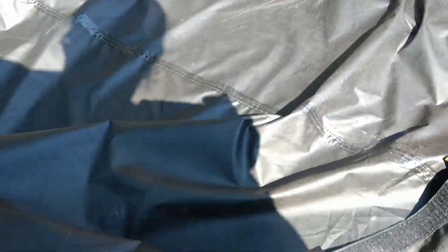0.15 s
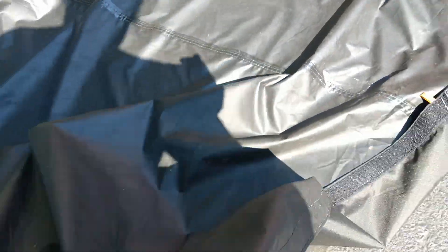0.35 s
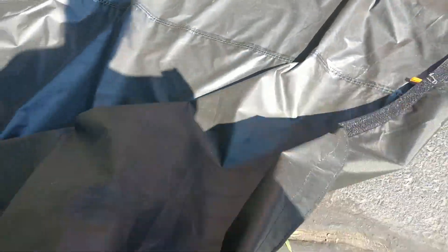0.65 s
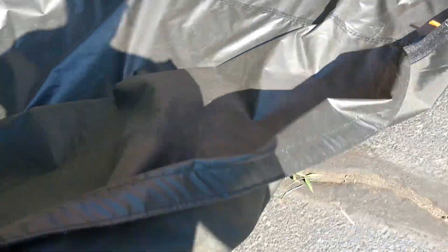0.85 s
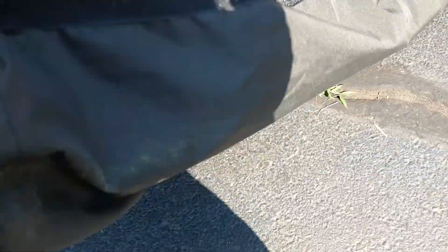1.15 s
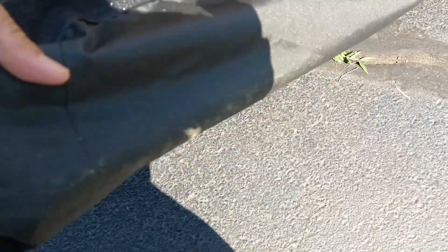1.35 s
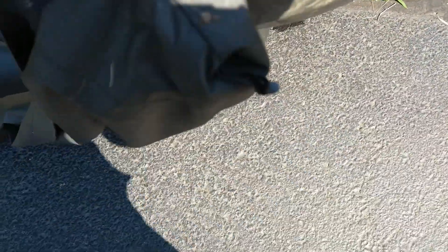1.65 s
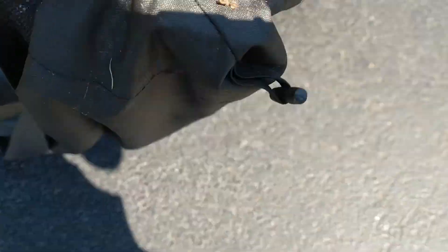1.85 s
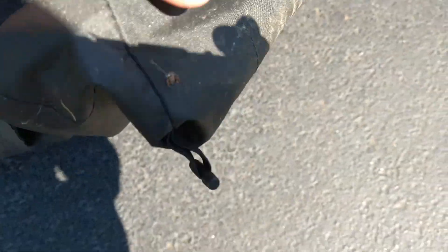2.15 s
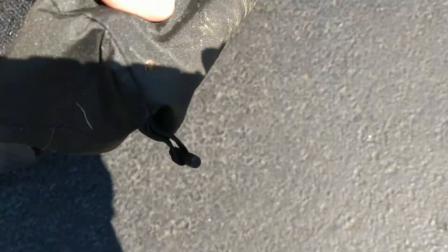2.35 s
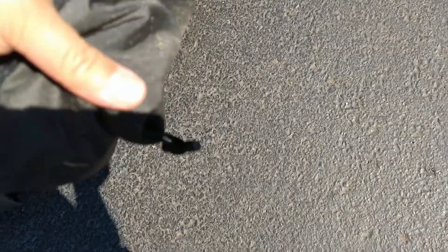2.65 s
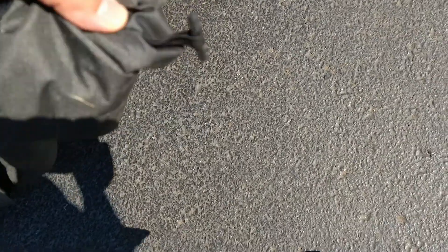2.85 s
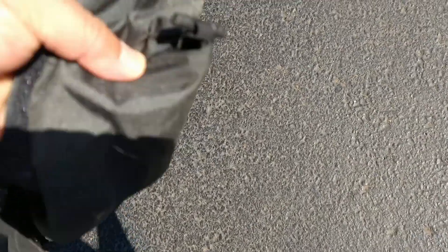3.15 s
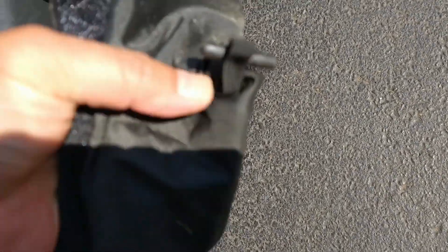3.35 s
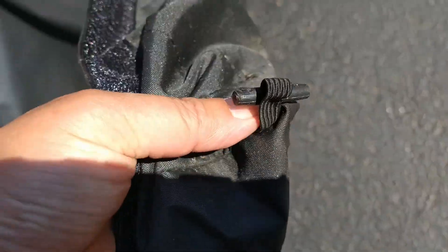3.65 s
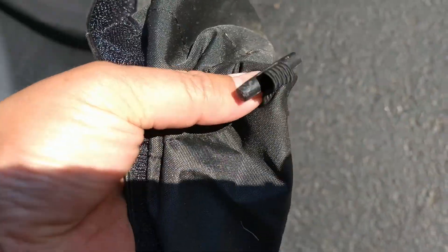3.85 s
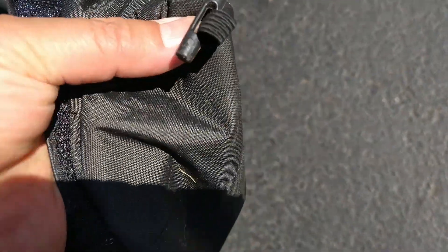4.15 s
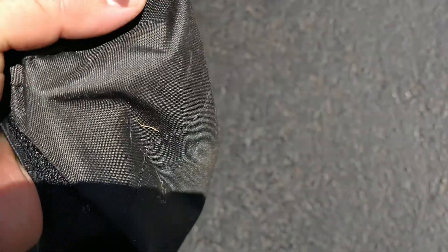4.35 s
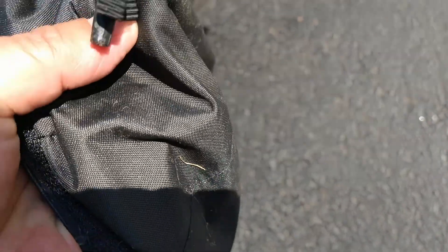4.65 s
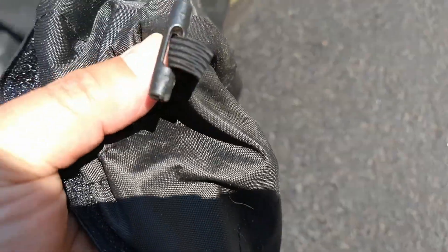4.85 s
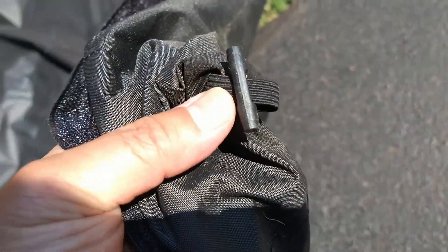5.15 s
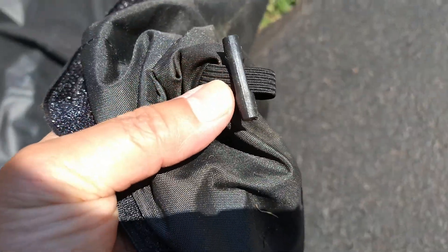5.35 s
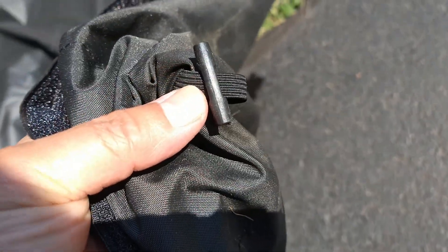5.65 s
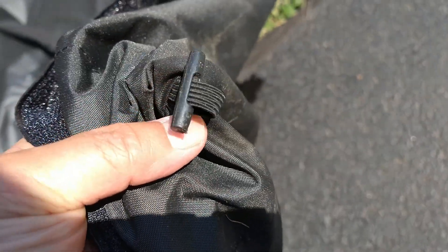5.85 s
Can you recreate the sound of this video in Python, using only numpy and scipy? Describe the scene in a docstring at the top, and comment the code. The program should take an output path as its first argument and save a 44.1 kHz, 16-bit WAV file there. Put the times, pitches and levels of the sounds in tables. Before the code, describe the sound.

Outdoors, very close and dry in stereo, a stiff coated-fabric cover is already moving at 0 s, swishing brightly with a weave rasp and papery crumple. Two short hook-and-loop rips come at about 0.4 and 0.55 s, among flapping folds. The hauling continues with brief lulls; a hard snap lands near 0.87 s, and more pops and puffs of air cluster from 1.1 to 1.35 s. A longer, gritty rip runs from 1.5 to 1.9 s, then things ease around 2 s. Softer rustling and small crinkles build, with another short rip at 2.6-2.75 s. From 3.0 to 3.25 s hollow scrapes and sharp ticks crowd together. After 3.5 s it is much quieter: a click at 3.6, faint finger rubbing, little slips and plastic ticks from 4.1 to 4.85, a clearer one at 4.47, and sparse ticks until 5.6. A distant bird whistles faintly near 5.7 s over still air and low hum.

```python
"""Outdoors on pavement, close to a stereo pair: a stiff coated-fabric cover is hauled along from the start.
Filtered grains give the swish and crumple, impulses the flaps; its hook-and-loop strip rasps in short rips,
a longer one after 1.5 s and another near 2.6 s. Small clicks gather as a hand bunches the cloth.
From 3.5 s fingers rub the weave and turn a plastic toggle with small double ticks.
Near the end a bird, two sine whistles, calls far off; air noise and a faint two-tone hum lie under it all."""
import sys
import numpy as np
from scipy import signal
from scipy.fft import rfft, irfft, next_fast_len
from scipy.io import wavfile
from scipy.ndimage import map_coordinates

SR = 44100
rng = np.random.default_rng(int(sys.argv[2]) if len(sys.argv) > 2 else 0)


def log_audio(samples):
    """Write samples as a 16-bit WAV file to the path given in sys.argv[1]."""
    # one column per channel
    frames = np.atleast_2d(samples).T
    # limit to full scale, then quantise
    limited = np.clip(frames, -1, 1)
    pcm = np.round(limited * 32767).astype(np.int16)
    wavfile.write(sys.argv[1], SR, pcm)


N = 265041

# All table levels are relative: each layer is trimmed again where it is mixed.


def amp(db):
    """Decibels to gain."""
    return 10 ** (np.asarray(db) / 20)


def unit(pair):
    """Scale a stereo pair so that its centre has rms 1."""
    return pair / np.sqrt(np.mean(pair.mean(0) ** 2) + 1e-20)


def along(points, hz):
    """Read (frequency [Hz], value) points on a log frequency axis."""
    f, v = np.transpose(points)
    return np.interp(np.log(hz + 1), np.log(f + 1), v)


def gains(rows):
    """A gain per sample from (time [s], level [dB]) rows, fading out beyond the first and last."""
    s, db = np.transpose(rows)
    t = np.arange(N) / SR
    seconds_outside = np.abs(t - np.clip(t, s[0], s[-1]))
    return amp(np.interp(t, s, db)) * np.exp(-seconds_outside / 0.0061)


def swells(rows):
    """A gain per sample: each (middle [s], level [dB], half length [s]) movement rises and falls evenly."""
    t = np.arange(N) / SR
    return sum(amp(db) * np.exp(-((t - s) / half) ** 2) for s, db, half in rows)


def strokes(rows):
    """A gain per sample: each (start [s], level [dB], length [s]) stroke starts quickly and eases off."""
    t = np.arange(N) / SR
    # the end values hold outside the stroke as a very low floor
    place, shape = [0, .15, .8, 1.2], [0.012, 0.83, 0.82, 0.0013]
    return sum(amp(db) * np.interp((t - s) / length, place, shape) for s, db, length in rows)


def follow(gain, from_db, to_db, grows):
    """A gain that is to_db when the driving gain is from_db, and changes by grows dB for each of its dB."""
    return amp(to_db) * (gain / amp(from_db)) ** grows


def wobble(rate):
    """A smooth random curve, rate knots a second."""
    return map_coordinates(rng.standard_normal(int(N * rate / SR) + 4), [np.arange(N) * rate / SR])


def snaps(rate, spread_db, bed):
    """Tiny releases at random moments, rate a second, over a bed of noise for countless smaller ones."""
    scatter = np.clip(rng.standard_normal(N), -2, 2)
    sizes = (rng.random(N) < rate / SR) * amp(spread_db * scatter)
    return unit(sizes * rng.standard_normal((2, N))) + bed * rng.standard_normal((2, N))


def patchy(pair, depth_db, size=256):
    """Shifting folds favour now one pitch, now another."""
    z = signal.stft(pair, nperseg=size)[2]
    patch = np.outer(np.hanning(7), np.hanning(9))  # pitch by time
    field = signal.convolve2d(rng.standard_normal(z.shape[1:]), patch, "same")
    return signal.istft(z * amp(depth_db * field / field.std()), nperseg=size)[1][:, :N]


def causal(db):
    """The minimum-phase response with these levels: it rings only after a blow."""
    c = irfft(np.log(amp(db)))
    c[1:len(c) // 2] *= 2
    c[len(c) // 2 + 1:] = 0
    return np.exp(rfft(c))


# Likeness of the two microphones: (frequency [Hz], left-right correlation [-1 to 1])
MICROPHONE_LIKENESS = [(60, 0.96), (400, 0.9), (900, 0.5), (1500, -0.176), (3500, -0.4), (6000, 0.051),
                       (12000, 0)]


def voiced(pair, colour, pan, size=4096):
    """Two unrelated excitations ring in one colour and reach the two microphones."""
    hz = np.fft.rfftfreq(size, 1 / SR)
    octaves_outside = np.abs(np.log2((hz + 1) / np.clip(hz + 1, colour[0][0], colour[-1][0])))
    db = along(colour, hz) - 12 * octaves_outside
    # mixing the excitations at opposite angles sets the likeness
    turn = np.arccos(np.clip(along(MICROPHONE_LIKENESS, hz), -.95, .95)) / 2
    lean_db = along(pan, hz) / 2
    ears = []
    for sign in (1, -1):
        mix = [np.cos(turn), sign * np.sin(turn)]
        ring = irfft(causal(db + sign * lean_db) * mix)[:, :size // 2]
        ears.append(signal.oaconvolve(pair, ring, axes=1).sum(0)[:pair.shape[1]])
    return np.array(ears)


def add(track, s, sound):
    """Mix a sound into the track at time s."""
    part = track[:, round(s * SR):][:, :sound.shape[1]]
    part += sound[:, :part.shape[1]]


# Short pulls on the strip, one list each: (time [s], rasp level [dB])
SHORT_RIPS = [
    [(0.36, -35), (0.388, -26), (0.426, -28), (0.434, -35.5), (0.45, -54)],
    [(0.5, -42), (0.518, -34.5), (0.532, -24), (0.576, -23), (0.6, -24), (0.62, -36.5), (0.63, -40)],
    [(2.58, -39.5), (2.658, -21), (2.732, -26), (2.75, -42.5)],
]
# One longer pull: (time [s], rasp level [dB])
LONG_RIP = [(1.485, -45), (1.499, -33.5), (1.583, -23.5), (1.685, -27), (1.883, -20), (1.909, -26),
            (1.925, -40)]
# Colour of hooks leaving loops: (frequency [Hz], level per Hz [dB])
HOOK_COLOUR = [(1060, -45), (1800, -14.5), (2240, -13.5), (2640, -10.5), (3220, -4.5), (3690, 0),
               (4350, -4), (5360, -2), (6430, -14), (7430, -13), (8750, -6), (10000, -17), (14400, -31.5),
               (15800, -41.5)]
# Colour of the strip's taut backing: (frequency [Hz], level per Hz [dB])
BACKING_COLOUR = [(400, -18), (700, -11.5), (1000, -5.5), (1350, 5), (1750, -7), (2600, -22)]
# Lean of the rasps between the microphones: (frequency [Hz], left minus right [dB])
RIP_PAN = [(60, 12), (99, 8.5), (160, 12), (270, 12.5), (450, -10), (740, 0.5), (1220, -7), (2010, -1.5),
           (3330, -14.5), (5500, -12.0), (9080, -13.5), (15000, -9.5)]
# the backing drums only when the strip is taut: its level at a firm pull, and dB gained per dB of rasp
FIRM_PULL_DB, DRUM_DB, DRUM_GROWS = -20.5, -38.5, 2.7


def strip():
    """Hooks let go of their loops by the thousand, and each release plucks the taut backing."""
    rasp = sum(gains(rows) for rows in SHORT_RIPS) + gains(LONG_RIP)
    drumming = follow(rasp, FIRM_PULL_DB, DRUM_DB, DRUM_GROWS)
    clumps = amp(1.1 * wobble(300) + .4 * wobble(60))
    releases = patchy(clumps * snaps(rate=9000, spread_db=2.5, bed=.8), depth_db=2)
    hooks = amp(0.48) * rasp * unit(voiced(releases, HOOK_COLOUR, RIP_PAN))
    plucks = amp(0.51 * wobble(83)) * releases
    backing = amp(1.0) * drumming * unit(voiced(plucks, BACKING_COLOUR, RIP_PAN))
    return hooks + backing


# The hands stop for a new grip and the cloth eases: (middle [s], dip [dB], half length [s])
GRIP_PAUSES = [(0.672, 7, 0.027), (0.984, 9.5, 0.069), (1.453, 6, 0.028), (2.014, 7, 0.018),
               (3.351, 6, .025)]


def motion():
    """A gain per sample: 1 while the cloth moves, dipping at each pause."""
    t = np.arange(N) / SR
    return amp(-sum(dip_db * np.exp(-((t - s) / half) ** 2) for s, dip_db, half in GRIP_PAUSES))


# The weave dragged under pressure: (start [s], length [s], level [dB])
WEAVE_DRAGS = [(0.0, 0.43, -33.5), (0.453, 0.046, -44.5), (0.63, .03, -42), (0.722, 0.18, -34),
               (1.212, 0.028, -37.5), (1.347, 0.026, -37.5), (2.246, 0.17, -46), (2.769, 0.063, -49.5),
               (2.892, 0.042, -38), (3.216, .065, -43.5), (3.407, 0.08, -49)]
DRAG_ATTACK_S, DRAG_RELEASE_S = 0.019, 0.017  # time constants


def drags():
    """A gain per sample: each drag takes hold, keeps its level and lets go."""
    t = np.arange(N) / SR
    total = np.zeros(N)
    for s, length, db in WEAVE_DRAGS:
        before, after = np.minimum(t - s, 0), np.maximum(t - s - length, 0)
        total += amp(db) * np.exp(before / DRAG_ATTACK_S - after / DRAG_RELEASE_S)
    return total


# The cover hauled along, one list a stretch: (time [s], sliding level [dB])
HAUL = [
    [(0.0, -44), (0.256, -47), (0.444, -44.5), (0.5, -39.5)],
    [(0.63, -46), (0.708, -46), (0.84, -48), (1.068, -44), (1.182, -49.5), (1.47, -48)],
    [(2.0, -61), (2.176, -52.5), (2.548, -45.5), (3.112, -49), (3.466, -63), (3.55, -74.5)],
]
# Quick swipes of cloth over cloth: (middle [s], level [dB], half length [s])
SWIPES = [(0.313, -35, 0.053), (0.412, -41, .01), (0.885, -46, .015), (1.04, -46, 0.016),
          (1.209, -39, 0.04), (1.298, -48, 0.0093), (1.965, -44, 0.033), (2.066, -50.5, 0.015),
          (2.391, -38.5, 0.018), (2.549, -41, 0.017), (2.925, -40.5, 0.009), (3.223, -34.5, 0.0046),
          (3.413, -45.5, 0.019)]
# Colour of cloth swishing: (frequency [Hz], level per Hz [dB])
SWISH_COLOUR = [(1500, -12.5), (3000, -5), (5000, -5.5), (6500, -1), (7600, -1), (8700, -3), (10000, -8.5),
                (12000, -15), (15800, -22.5)]
# Colour of the weave rasping: (frequency [Hz], level per Hz [dB])
WEAVE_COLOUR = [(1200, -33), (2300, -8), (3500, -2), (4400, -3), (5400, -1), (6600, -14.5), (7500, -10),
                (8700, -2), (10500, -17.5)]
# Colour of the fine fizz: (frequency [Hz], level per Hz [dB])
FIZZ_COLOUR = [(7000, -41.5), (10500, 2), (12500, -4), (15500, -10)]
# Lean of the cloth between the microphones, also used below: (frequency [Hz], left minus right [dB])
CLOTH_PAN = [(100, 2), (1000, 0), (2200, -3), (3600, -11.5), (5400, -9.5), (6800, -3.5), (8700, -11),
             (11000, -4.5), (15000, -1)]
HAUL_WEAVE_DB, SWIPE_WEAVE_DB, FIZZ_DB = 0, -5.5, -5  # drive of rasp and fizz against the swish
GATHER_S, GATHER_DULLS_DB = (1.9, 3.5), 8.5  # from start to end of the gathering the fizz fades


def sliding():
    """Threads catch on threads: a swish, a rasp of the weave under pressure, and fine fizz."""
    haul = amp(0.5) * motion() * gains(np.vstack(HAUL))
    swipe = swells(SWIPES)
    swish = np.hypot(haul, swipe)
    moving_weave = np.hypot(amp(HAUL_WEAVE_DB) * haul, amp(SWIPE_WEAVE_DB) * swipe)
    weave = np.hypot(drags(), moving_weave)
    dulling = amp(np.interp(np.arange(N) / SR, GATHER_S, [0, -GATHER_DULLS_DB]))
    fizz = amp(FIZZ_DB) * swish * dulling

    catches = patchy(amp(0.87 * wobble(70)) * snaps(rate=1300, spread_db=3.5, bed=1.9), depth_db=2.5)
    hiss = amp(5.0) * swish * unit(voiced(catches, SWISH_COLOUR, CLOTH_PAN))
    threads = patchy(amp(0.85 * wobble(120)) * snaps(rate=1800, spread_db=3.5, bed=1.4), depth_db=1.5)
    rasp = amp(-1.5) * weave * unit(voiced(threads, WEAVE_COLOUR, RIP_PAN))
    specks = snaps(rate=620, spread_db=6.5, bed=1.5)
    fine = amp(2) * fizz * unit(voiced(specks, FIZZ_COLOUR, CLOTH_PAN))
    return hiss + rasp + fine


# How hard the sheet is bent: (time [s], crumple level [dB])
BENDING = [(0.0, -48), (0.43, -47.5), (0.73, -50), (0.89, -47), (1.1, -54), (1.26, -45.5), (1.37, -54.5),
           (1.6, -55.5), (1.76, -51), (1.82, -45.5), (1.97, -64.5), (2.2, -60.5), (2.65, -50.5),
           (3.05, -56.5), (3.11, -52), (3.23, -60), (3.47, -67), (3.6, -84)]
# The sheet drops and pushes out a puff of air: (middle [s], level [dB], half length [s])
PUFFS = [(0.9, -49, 0.034), (1.16, -47.5, 0.024), (1.265, -42, .015), (1.355, -43, .015),
         (1.787, -45.5, .012), (1.972, -44, 0.018)]
# Colour of creases buckling: (frequency [Hz], level per Hz [dB])
CRUMPLE_COLOUR = [(150, -10.5), (450, -8.5), (700, 4), (1050, 3), (1500, 2.5), (2200, -3), (4000, -21.5)]
# Colour of air pushed by the sheet: (frequency [Hz], level per Hz [dB])
BILLOW_COLOUR = [(25, -35.5), (45, -13.5), (70, 4), (130, -0.5), (250, -2.5), (450, -10), (900, -14.5)]
# air pushed at a usual crumple, and dB gained per dB of crumple
USUAL_CRUMPLE_DB, BILLOW_DB, BILLOW_GROWS = -47, -52.5, .6


def bending():
    """The stiff sheet buckles in many small creases and pushes air as it billows."""
    crumple = amp(3.5) * motion() * gains(BENDING)
    billow = follow(crumple, USUAL_CRUMPLE_DB, BILLOW_DB, BILLOW_GROWS) + swells(PUFFS)
    jerks = amp(2.1 * wobble(70))
    buckles = jerks * snaps(rate=400, spread_db=2.0, bed=1)
    creases = unit(voiced(buckles, CRUMPLE_COLOUR, CLOTH_PAN))
    pushes = jerks * snaps(rate=250, spread_db=3.5, bed=1.6)
    air = unit(voiced(pushes, BILLOW_COLOUR, CLOTH_PAN))
    return amp(-0.5) * crumple * creases + amp(-2.0) * billow * air


# Folds flipping over: (time [s], pop level [dB], shiver level [dB], shiver 60 dB decay [s])
FOLD_FLIPS = [(0.194, -39, -30, .054), (0.315, -43, -32, .04), (0.478, -36, -26, 0.053),
              (0.534, -23, -30, 0.028), (0.585, -25, -26, 0.045), (0.8627, -18.5, -18, 0.018),
              (0.888, -36, -32, 0.029), (1.093, -29, -30, 0.051), (1.144, -33, -31, 0.11),
              (1.18, -29, -32, 0.07), (1.248, -26.5, -28.5, .04), (1.2626, -18, -22, 0.041),
              (1.332, -36, -24, 0.05), (1.354, -32, -26.5, 0.089), (1.965, -34.5, -35.5, 0.084),
              (2.498, -40, -23, 0.024), (3.0718, -30, -25, 0.024), (3.222, -46, -34.5, .037),
              (3.312, -38, -39, 0.028), (4.243, -43, -45, 0.027), (4.755, -50, -40, 0.024),
              (4.782, -49, -40.5, 0.021), (4.831, -59, -42, 0.022)]
# Colour of a shivering fold: (frequency [Hz], level per Hz [dB])
FOLD_COLOUR = [(50, -14.5), (130, 3), (350, 0.5), (600, -3), (1050, -1.5), (1700, -4.5), (2600, -13),
               (4000, -8.5), (9000, -37)]


def folds(size=4096):
    """A large fold flips: one push and pull of air, stronger at the right microphone, then a shiver."""
    track = np.zeros((2, N))
    t = np.arange(size) / SR
    u = (t - .001) / 0.00016
    flip = -u * np.exp((1 - u ** 2) / 2) * amp([[-11], [4.5]])
    onset = 1 - np.exp(-t / 0.00082)
    for s, pop_db, shiver_db, t60 in FOLD_FLIPS:
        shiver = onset * unit(voiced(rng.standard_normal((2, size)), FOLD_COLOUR, CLOTH_PAN))
        decay = amp(shiver_db - 4.5 - 60 * t / t60)
        add(track, s - .001, amp(pop_db) * flip + decay * shiver)
    return track


# The sheet scraping over itself: (start [s], level [dB], length [s])
SCRAPES = [(2.493, -40.5, .014), (2.53, -40, 0.026), (3.003, -46, 0.023), (3.062, -35, 0.045),
           (3.135, -38, 0.022), (3.17, -44, 0.014)]
# Colour of a hollow fold: (frequency [Hz], level per Hz [dB])
SCRAPE_COLOUR = [(350, -35.5), (620, -12), (820, -8), (980, 2), (1200, -12.5), (1800, -11.5), (3000, -39.5)]


def scrapes():
    """The sheet sticks and slips, and its hollow fold rings near one kilohertz."""
    slips = snaps(rate=360, spread_db=2.5, bed=0.45)
    return amp(-1) * strokes(SCRAPES) * unit(voiced(slips, SCRAPE_COLOUR, CLOTH_PAN))


def crinkles(count=90):
    """As the hand bunches the cloth, small wrinkles click ever more densely, each at its own pitch."""
    track = np.zeros((2, N))
    t = np.arange(SR // 100) / SR
    for when, pitch, strength, phase in rng.random((count, 4)):
        hz = 3200 * 2 ** (1.5 * pitch)
        decay = amp(-41 + 11 * strength ** 2 - 60 * t / 0.0058)
        click = decay * np.sin(2 * np.pi * (hz * t + [[phase], [0]]))
        add(track, 2.25 + 0.95 * np.sqrt(when), click * amp([[-5], [3]]))
    return track


def blow(colour, shiver_db, t60, size=4096):
    """One sharp impulse with a weak shiver after it, scaled to a centre peak of 1."""
    t = np.arange(size) / SR
    force = amp(shiver_db - 60 * t / t60) * rng.standard_normal((2, size))
    force[0, 0] += 1
    pair = voiced(force, colour, CLOTH_PAN)
    return pair / np.abs(pair.mean(0)).max()


# Sharp ticks of creases and toggle: (time [s], level [dB], bright release against that level [dB])
TICKS = [(1.0305, -22, -2), (1.3022, -23.5, 1), (2.9907, -20, -6), (3.041, -18, -6), (3.071, -19.5, -12),
         (3.15, -20.5, -4.5), (3.1734, -18, -8), (3.222, -40, -12), (3.2439, -20, -20), (3.575, -23, -18),
         (4.1302, -37, -11), (4.242, -31.5, -26), (4.2742, -34, -9), (4.343, -37, -15), (4.369, -29, -11.5),
         (4.3804, -30.5, -13), (4.4692, -20, -17), (4.7346, -33.5, -29), (4.78, -34.5, -26),
         (4.8286, -34.5, -17.5), (5.0897, -33, -10), (5.144, -40, -28), (5.2393, -40.5, -13.5),
         (5.5685, -32, -3.5)]
# Colour of the duller stop: (frequency [Hz], level per Hz [dB])
STOP_COLOUR = [(700, -13.5), (1800, -13.5), (3300, 5.5), (4200, 5), (5400, 1.5), (7000, -3.5), (12000, -32)]
# Colour of the bright release: (frequency [Hz], level per Hz [dB])
RELEASE_COLOUR = [(3500, -50), (6500, -18), (8600, -0.5), (11000, -18), (15500, -19.5)]


def ticks():
    """Creases and the plastic toggle tick twice: a bright release, then a duller stop just after."""
    track = np.zeros((2, N))
    for s, db, top_db in TICKS:
        add(track, s + .0005, amp(db + top_db) * blow(RELEASE_COLOUR, shiver_db=-17.5, t60=0.013))
        add(track, s + 0.0013, amp(db - 1.5) * blow(STOP_COLOUR, shiver_db=-28.5, t60=0.028))
    # a nearby surface answers faintly
    return track + amp(-12.5) * np.roll(track, round(0.0055 * SR), axis=1)


# Fingers rubbing the cloth: (time [s], level [dB])
FINGER_RUBS = [(3.5, -60.5), (3.78, -62.5), (4.03, -66.5), (4.27, -68), (4.46, -61), (4.67, -65),
               (4.83, -70), (5.25, -73), (6.01, -73.5)]
# Short slips of the fingers: (start [s], level [dB], length [s])
FINGER_SLIPS = [(4.243, -52, 0.035), (4.365, -48.5, 0.072), (4.488, -47, 0.02), (4.62, -52.5, 0.056),
                (4.838, -47.5, 0.029)]
# Colour of fingertips rubbing: (frequency [Hz], level per Hz [dB])
RUB_COLOUR = [(880, -20), (1500, -8.5), (1660, -15.5), (2040, -13.5), (2380, -13), (3570, -6), (4390, -7.5),
              (7770, -9), (12200, -21), (13800, -22), (15800, -30)]
# Colour of skin slipping on the weave: (frequency [Hz], level per Hz [dB])
SLIP_COLOUR = [(2000, -9), (2700, -13), (3500, 4), (4600, -9), (7000, -5.5), (8600, -7.5), (11000, -20.5),
               (15500, -17.5)]


def fingers():
    """Fingertips creep over the weave and now and then slip."""
    catches = amp(2.2 * wobble(45)) * snaps(rate=1100, spread_db=0.5, bed=2.2)
    creep = amp(2.0) * gains(FINGER_RUBS) * unit(voiced(catches, RUB_COLOUR, CLOTH_PAN))
    threads = snaps(rate=1500, spread_db=2, bed=1.2)
    slip = amp(-4.5) * strokes(FINGER_SLIPS) * unit(voiced(threads, SLIP_COLOUR, CLOTH_PAN))
    return creep + slip


# Distant whistles of a bird: (middle [s], pitch [Hz], level [dB], half length [s])
WHISTLES = [(5.705, 4110, -68.5, 0.056), (5.665, 2300, -75, .018)]


def bird():
    """Faint sine whistles swell, waver slightly and fade, leaning to the right microphone."""
    t = np.arange(N) / SR
    waver = 1.1 * wobble(50)  # radians
    song = np.zeros(N)
    for s, hz, db, half in WHISTLES:
        swell = amp(db) * np.exp(-((t - s) / half) ** 2)
        song += swell * np.sin(2 * np.pi * hz * t + waver)
    return song * amp([[-5], [3]])


# Distant machinery: (frequency [Hz], level [dB])
HUM_TONES = [(118.4, -71), (183.0, -69)]
# Colour of the open air: (frequency [Hz], level per Hz [dB])
AIR_COLOUR = [(15, -58), (25, -40.5), (38, -11), (184, -7), (211, -13), (255, -14), (316, -21),
              (361, -21.5), (587, -23.5), (691, -23.5), (1320, -30.5), (2810, -36.5), (3990, -29),
              (4330, -32.5), (15800, -38)]
# Lean of the air between the microphones: (frequency [Hz], left minus right [dB])
AIR_PAN = [(100, -0.5), (1000, 1.5), (2200, -1.5), (3600, -10), (6800, -7.5), (8700, -17.5), (12000, 1)]


def outdoors():
    """Still air with a low rumble and a far hum that wavers in level and phase."""
    t = np.arange(N) / SR
    hum = np.zeros(N)
    for hz, db in HUM_TONES:
        hum += amp(db + 1.4 * wobble(3.2)) * np.sin(2 * np.pi * hz * t + 0.67 * wobble(7.1))
    air = unit(voiced(rng.standard_normal((2, N)), AIR_COLOUR, AIR_PAN))
    return amp(-63.5) * air + amp(1.5) * hum


def scene():
    """The cover and hands close by and nearly dry, with the bird, air and hum behind."""
    cloth = sliding() + bending() + scrapes() + folds() + crinkles()
    return strip() + cloth + ticks() + fingers() + bird() + outdoors()


TOP_HZ = 15900  # the recorder's band limit


def record(dry):
    """The recorder rounds off the highest peaks and keeps nothing above its band limit."""
    rounded = dry / (1 + np.abs(dry / .8) ** 6) ** (1 / 6)
    m = next_fast_len(N + SR // 2)
    in_band = np.fft.rfftfreq(m, 1 / SR) < TOP_HZ
    return irfft(rfft(rounded, m) * in_band, m)[:, :N]


dry = scene()
out = record(dry)
log_audio(out)
```